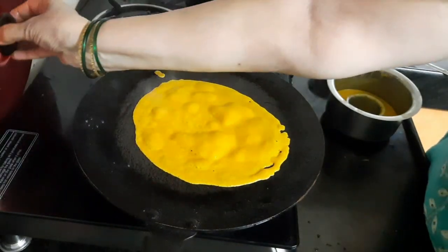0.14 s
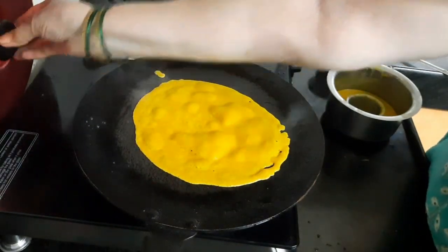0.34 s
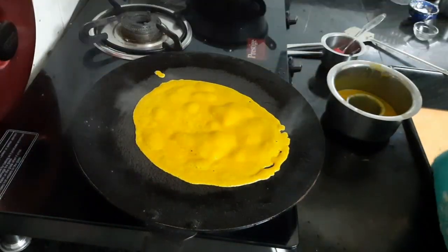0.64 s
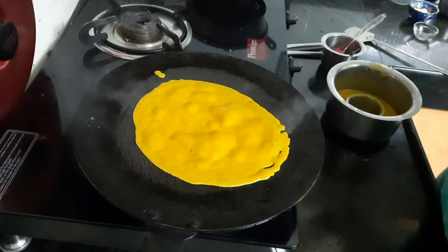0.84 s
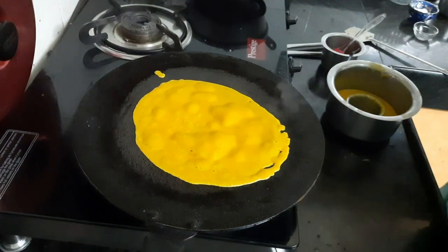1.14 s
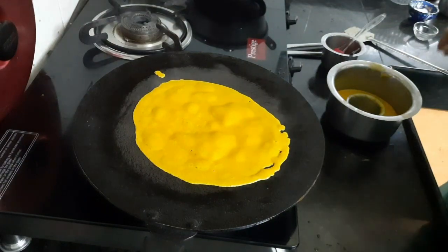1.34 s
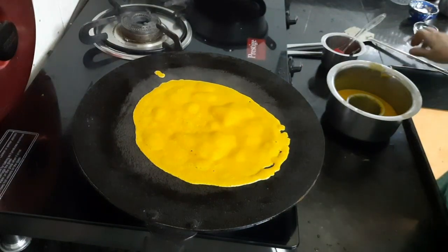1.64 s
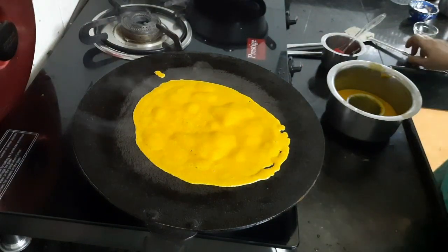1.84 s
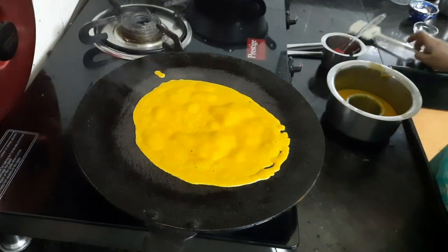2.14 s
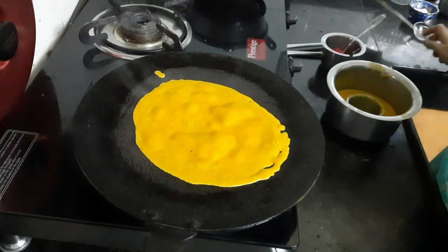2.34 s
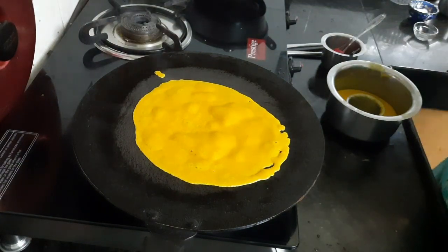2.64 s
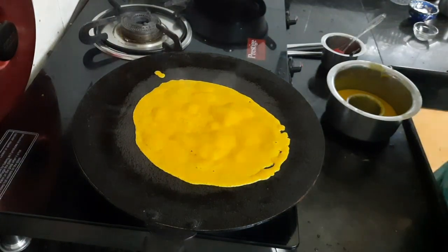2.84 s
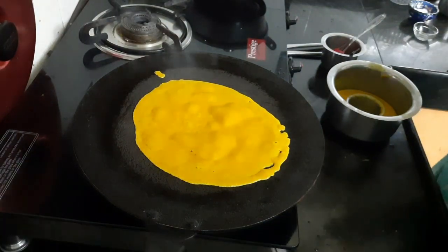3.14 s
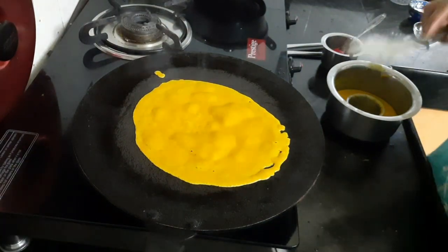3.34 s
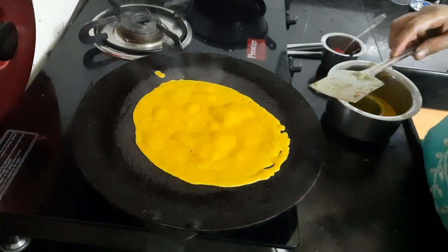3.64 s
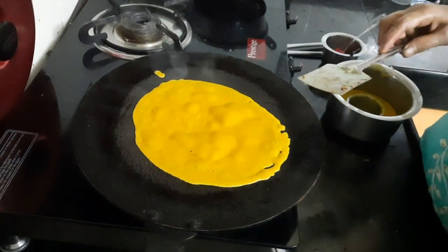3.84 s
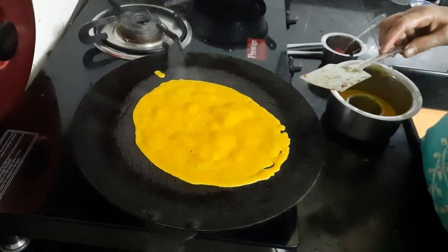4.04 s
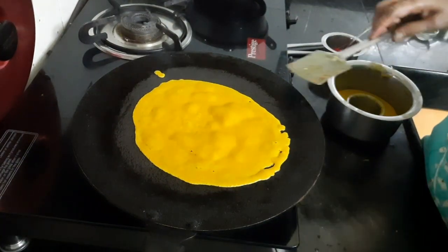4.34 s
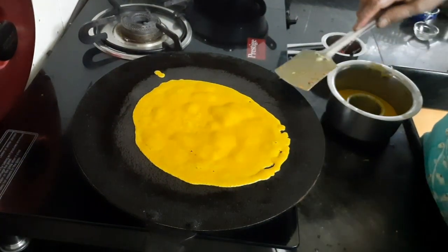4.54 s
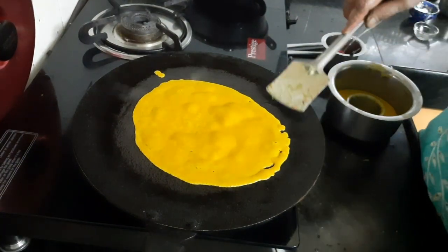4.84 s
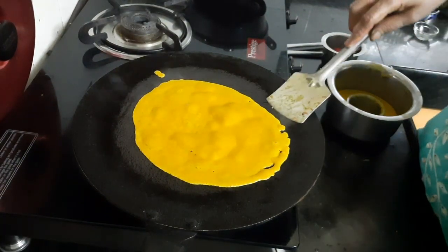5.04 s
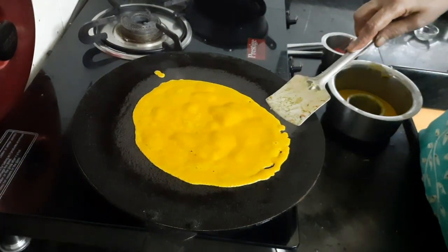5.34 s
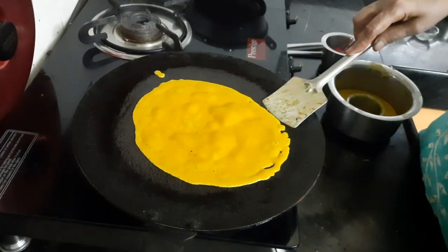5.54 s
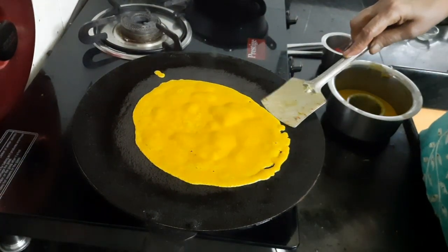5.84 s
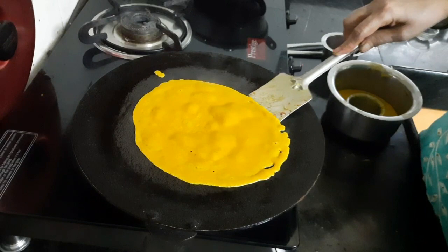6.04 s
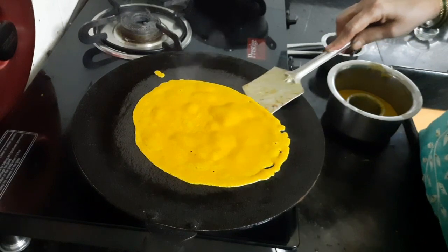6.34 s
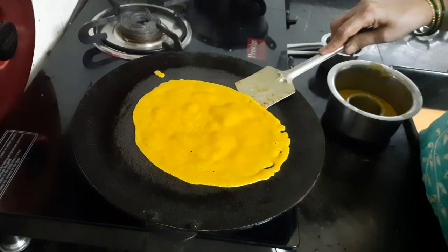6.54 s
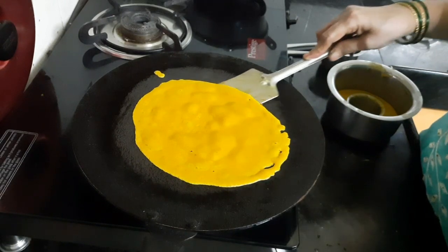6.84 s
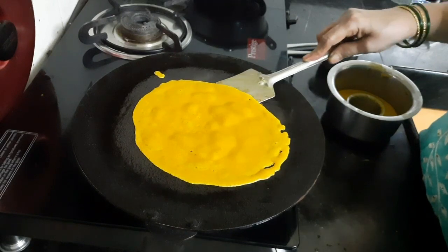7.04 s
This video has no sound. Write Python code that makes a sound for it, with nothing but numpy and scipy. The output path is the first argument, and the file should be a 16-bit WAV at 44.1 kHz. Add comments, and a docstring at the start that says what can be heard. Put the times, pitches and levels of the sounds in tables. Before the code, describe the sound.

Bright frying hiss with sharp crackling pops and an early metal pot clatter fades to near quiet, followed by gritty spatula scrapes on iron.

```python
"""Over mains hum and a low household rumble, batter sizzles on a hot iron griddle in a small hard kitchen:
sputtering noise grains make the hiss. A steel pot is set down nearby: short blows shake its resonances.
Bubbles spit, each a click with a rush of steam and a thud with a dull tail, and the sizzle dies away.
Then a steel spatula lands on the iron and scrapes under the edge of the pancake: gritty noise rasps and
rings the blade in short pushes, while bits of crust crack off."""
import sys
import numpy as np
from scipy import signal
from scipy.fft import rfft, irfft, next_fast_len
from scipy.io import wavfile
from scipy.ndimage import map_coordinates

SR = 44100
rng = np.random.default_rng(int(sys.argv[2]) if len(sys.argv) > 2 else 0)


def pcm_store(signal):
    """Save signal as 16-bit PCM."""
    levels = np.round(np.clip(np.atleast_2d(signal), -1, 1) * 32767)
    wavfile.write(sys.argv[1], SR, levels.astype(np.int16).T)


def gain_from_decibels(decibels):
    """Convert decibel values to linear amplitude factors."""
    exponent = np.asarray(decibels, float) / 20
    return 10 ** exponent


N = 316638  # length of the scene [samples]

# tone of the bright fizz: (frequency [Hz], relative level [dB])
BRIGHT_FIZZ = [(2060, -27.5), (3500, -5.5), (11900, 8.5), (15700, 3.5)]
# tone of the dull fizz and of the thuds' tails: (frequency [Hz], relative level [dB])
DULL_FIZZ = [(400, -11.5), (900, -13), (2500, -1), (5000, -6), (8000, -32.5)]
# spatula blows on the griddle: (time [s], blow level [dB], contact time [ms])
SPATULA_TAPS = [(4.927, -33.5, 0.073), (6.36, -50.5, 0.18), (6.845, -30, 0.36), (6.855, -49, 0.65),
                (6.895, -54, 0.55), (7.113, -38.5, 0.41)]
# short pushes of the blade along the iron: (start [s], length [s], rasp level [dB], blade ring level [dB])
BLADE_PUSHES = [(4.97, 0.029, -52, -62), (5.443, 0.0029, -55, -57), (5.887, 0.11, -51, -65),
                (6.02, 0.033, -49, -52.5), (6.233, 0.106, -50.5, -66), (6.357, 0.091, -72.5, -60),
                (6.499, 0.91, -51, -71.5), (6.728, 0.035, -42, -52.5), (6.822, .11, -49.5, -62.5),
                (7.127, .1, -51, -57)]


def unit(x):
    """Scale to an rms of 1."""
    return x / np.sqrt(np.mean(x ** 2) + 1e-20)


def along(points, hz):
    """Read a curve of (Hz, value) points on a log frequency axis."""
    f, v = np.transpose(points)
    return np.interp(np.log(hz + 1), np.log(f + 1), v)


def curves(rows):
    """One value per sample for each column after the time."""
    s, *cols = np.transpose(rows)
    return [np.interp(np.arange(N) / SR, s, c) for c in cols]


def wobble(rate):
    """A smooth random curve with rate knots a second."""
    knots = rng.standard_normal(int(N * rate / SR) + 4)
    return map_coordinates(knots, [np.arange(N) * rate / SR])


def filtered(x, response):
    """Multiply the spectrum of x by a complex response of frequency."""
    m = next_fast_len(x.shape[-1] + SR // 2)
    spectrum = rfft(x, m) * response(np.fft.rfftfreq(m, 1 / SR))
    return irfft(spectrum, m)[..., :x.shape[-1]]


def coloured(x, spectrum):
    """Shape x by a (Hz, dB) spectrum, then scale to an rms of 1."""
    return unit(filtered(x, lambda hz: gain_from_decibels(along(spectrum, hz))))


def resonant(x, peaks):
    """Send x through side-by-side resonances (Hz, width Hz, dB) of alternating sign."""
    def response(f):
        return sum((-1) ** k * gain_from_decibels(db) * 1j * f * w / (c * c - f * f + 1j * f * w)
                   for k, (c, w, db) in enumerate(peaks))
    return filtered(x, response)


def crackle(per_second, spread_db, noise):
    """Tiny random clicks of very unequal size on a bed of noise."""
    size = np.minimum(rng.exponential(size=N), 3.5)
    happens = rng.random(N) < per_second / SR
    grains = happens * rng.choice([-1, 1], N) * gain_from_decibels(spread_db * size)
    return unit(grains) + noise * rng.standard_normal(N)


def clicks(times, db, splutter_db, splutter_s=.006, lead_s=.0013):
    """Sharp pressure steps of random sign, just after each time, each wrapped in a brief splutter of noise."""
    step = np.zeros(N)
    step[np.round((times + lead_s) * SR).astype(int)] = gain_from_decibels(db)
    t = np.arange(-SR // 200, SR // 50) / SR
    swell = gain_from_decibels(splutter_db - 60 * np.abs(t) / splutter_s)
    strength = signal.fftconvolve(step, swell)[SR // 200:][:N]
    splutter = strength * rng.standard_normal(N)
    return step * rng.choice([-1, 1], N) + splutter


def struck(rows, peaks, clank, chatter_s, touch_db):
    """Every blow is a short chatter that shakes the resonances; a longer, softer contact wakes only the low ones."""
    detune, uneven_db = .01, 1.5  # each blow lands elsewhere: scatter of pitch (share) and level
    out, t = np.zeros(N + SR), np.arange(SR // 2) / SR
    for s, db, contact_ms in rows:
        chatter = gain_from_decibels(db - 60 * t / chatter_s) * rng.standard_normal(len(t))
        chatter[0] = gain_from_decibels(db + touch_db)  # the first touch is one firm push
        cutoff_hz = min(500 / contact_ms, .45 * SR)
        force = signal.sosfilt(signal.butter(2, cutoff_hz, fs=SR, output="sos"), chatter)
        scatter = rng.standard_normal((len(peaks), 2))
        modes = [(hz * (1 + detune * a), w, level_db + uneven_db * b)
                 for (hz, w, level_db), (a, b) in zip(peaks, scatter)]
        # countless weak high modes merge into a broad clank
        out[round(s * SR):][:len(t)] += resonant(force, modes) + resonant(force, [clank])
    return out[:N]


def placed(x, left_lead_s, left_db, wet_db, spread_s, size):
    """Sound from four nearby spots in turn, size samples each, with own port delays and kitchen echoes."""
    # time the kitchen echo takes to fall 60 dB: (frequency [Hz], time [s])
    echo_t60 = [(200, 0.15), (1000, 0.41), (4000, 0.34), (12000, 0.26)]
    # part of the echo that differs between the ports: (frequency [Hz], share)
    echo_apart = [(100, 0.067), (400, .5), (1000, 0.47)]
    side, spot = np.array([.5, -.5])[:, None, None], np.arange(4)[:, None]
    spots = x * (np.arange(N) // size % 4 == spot)
    lead = left_lead_s + spread_s * (spot - spot.mean())
    direct = filtered(spots, lambda hz: np.exp(2j * np.pi * hz * side * lead))
    # the echo is noise that fades at its own speed in each frequency band
    hz, t, z = signal.stft(rng.standard_normal((4, 2, SR // 2)), SR, nperseg=256)
    z[:, 1] *= np.clip(along(echo_apart, hz), 0, 1)[:, None]
    fade = gain_from_decibels(-60 * t / along(echo_t60, hz)[:, None])
    shared, apart = signal.istft(z * fade, SR, nperseg=256)[1].swapaxes(0, 1)
    tails = np.array([shared + apart, shared - apart]) / np.linalg.norm(shared[0] + apart[0])
    late = np.pad(spots, ((0, 0), (150, 0)))  # the echo starts 150 samples late
    echo = signal.fftconvolve(late[None], tails, axes=2)[..., :N]

    def shade(hz):
        # the ports differ in level, fully only in the treble
        return gain_from_decibels(side[..., 0] * left_db * np.minimum(hz / 7000, 1))
    return filtered((direct + gain_from_decibels(wet_db) * echo).sum(axis=1), shade)


def house():
    """A wavering mains hum, a nearly shared rumble and a faint broadband air noise unrelated between the ports."""
    # household background: (time [s], hum level [dB], rumble level [dB])
    background = [(0, -72, -50.5), (.9, -66.5, -61.5), (2.5, -63.5, -54.5), (3.2, -71.5, -61.5),
                  (5.3, -71, -61.5), (6.3, -63.5, -58), (7.18, -60.5, -56.5)]
    # hum tones: (frequency [Hz], relative level [dB])
    hum_tones = [(49, 0.5), (98, -0.5)]
    # tone of the rumble: (frequency [Hz], relative level [dB])
    rumble_tone = [(35, -36), (60, -12), (195, -1), (250, -4.5), (493, -2.5), (1200, -26.5), (2640, -120)]
    # tone of the air noise, strongest near 800 Hz: (frequency [Hz], relative level [dB])
    air_tone = [(470, -26.5), (800, -2.5), (2630, -11), (7820, -20.5), (11100, -12), (15700, -22.5)]
    air_db = -63.5
    hum_db, rumble_db = curves(background)
    t = np.arange(N) / SR
    hum = sum(gain_from_decibels(db + 3.5 * wobble(9)) * np.sin(2 * np.pi * hz * t + 1.2 * wobble(7))
              for hz, db in hum_tones)
    shared, apart = coloured(rng.standard_normal((2, N)), rumble_tone)
    rumble = gain_from_decibels(rumble_db + wobble(11.0)) * (shared + 0.47 * apart * np.array([[1], [-1]]))
    air = gain_from_decibels(air_db) * coloured(rng.standard_normal((2, N)), air_tone)
    return gain_from_decibels(hum_db) * hum + rumble + air


def hiss(steam_db):
    """Steam escapes in sputtering grains, as a bright fizz over a duller one."""
    steady_until_s = 2  # dense at first; sputters more as the batter dries
    body_db = -10.5  # dull fizz against the bright
    dried = np.arange(N) > steady_until_s * SR
    sputter = wobble(40) + .5 * wobble(24) * dried
    bright = coloured(crackle(500, 4, noise=.6), BRIGHT_FIZZ)
    dull = coloured(crackle(300, 6.2, noise=1.2), DULL_FIZZ)
    return gain_from_decibels(steam_db + 2.2 * sputter) * bright + gain_from_decibels(steam_db + body_db + 4.7 * sputter) * dull


def small_pops(steam_db):
    """Many small bubbles burst as bright clicks that follow the strength of the steam."""
    over_hiss_db = 23
    when, size_db = rng.random((2, 170)) * [[3.5], [16]]
    small = coloured(clicks(when, size_db, -13), BRIGHT_FIZZ)
    return gain_from_decibels(steam_db + over_hiss_db) * small / np.abs(small).max()


def bursts(s, db, thud_db):
    """Larger bubbles burst with a crack and a duller thud, and set off weaker cracks just after."""
    after_s, after_db = 0.027, -10  # neighbours: scale of the random wait, loudest against the crack
    wait, weaker_db = rng.random((len(s), 4, 2)).T * [[[1]], [[14]]]
    after_times = s + .003 - after_s * np.log(wait)
    after = clicks(after_times.ravel(), (db + after_db - weaker_db).ravel(), -14)
    cracks = resonant(clicks(s, db, -16) + after, [(12400, 10000, 1.3)])
    thuds = resonant(clicks(s, thud_db, -21.0), [(1340, 9200, 0.0023)])
    return cracks + thuds


def spit(s, db, thud_db):
    """Steam rushes out of each burst bubble as a bright noise, and its thud leaves a dull tail; both fade fast."""
    rush_db, tail_db = -29, -23.5  # rush of steam against the crack, dull tail against the thud
    fade_s = 0.04  # time to fall 60 dB
    starts = np.round(s * SR).astype(int)
    onsets = [np.bincount(starts, gain_from_decibels(level_db), N) for level_db in (db + rush_db, thud_db + tail_db)]
    rush, tail = signal.lfilter([1], [1, -gain_from_decibels(-60 / (fade_s * SR))], onsets)
    bright_noise = coloured(crackle(720, 4, noise=.7), BRIGHT_FIZZ)
    return rush * bright_noise + tail * coloured(rng.standard_normal(N), DULL_FIZZ)


def sizzle():
    """Escaping steam hisses while bubbles in the batter burst and spit, all on the griddle."""
    # steam escaping under the batter: (time [s], hiss level [dB])
    steam = [(0, -30), (.45, -31), (.65, -32.5), (1.2, -36), (1.44, -54.5), (1.53, -45.5), (1.58, -37.5),
             (1.75, -43.5), (1.98, -42.5), (2.1, -45), (2.38, -44), (2.45, -37.5), (2.55, -46), (2.72, -48),
             (2.79, -52.5), (2.83, -46), (3.1, -60), (3.4, -60.5), (3.7, -71)]
    # bursting bubbles: (time [s], crack level [dB], thud level [dB])
    bubbles = [(0.454, -9.5, -5.5), (0.514, -2.5, -15), (.867, -7, -7), (0.999, -6.5, -17),
               (1.048, -6.5, -18), (1.139, -5, -19), (1.168, -7.5, -0.5), (1.351, -13, -48),
               (1.462, -14.5, -43.5), (1.683, -9.5, -32), (1.721, -13, -34.5), (2.052, -16, -15),
               (2.124, -9.5, -26.5), (2.154, -18.5, -32), (2.171, -5, -7.5), (2.246, -10, -22.5),
               (2.273, -12.5, -21), (2.304, -5.5, -26.5), (2.328, -8.5, -15), (2.392, -8.5, -26.5),
               (2.419, -10.5, -27), (2.422, -11, -23.5), (2.501, -3.5, -22.5), (2.556, -13.5, -20.5),
               (2.561, -9, -29.5), (2.575, -3, -13), (2.590, -8.5, -11.5), (2.596, -1.5, -18),
               (2.640, -11, -15), (2.668, -14, -29), (2.680, -0.5, -16), (2.694, -12.5, -16.5),
               (2.729, -15, -33.5), (2.805, -13.5, -34.5), (2.812, -10, -24), (2.985, -12, -12),
               (3.119, 0.5, -13), (3.375, -22.5, -47)]
    steam_db, = curves(steam)
    s, db, thud_db = np.transpose(bubbles)
    noises = hiss(steam_db) + spit(s, db, thud_db)
    pops = bursts(s, db, thud_db) + small_pops(steam_db)
    return (placed(noises, .00018, 3.0, -6, spread_s=.00002, size=700)
            + placed(pops, .00018, 2.0, -8, spread_s=.00002, size=700))


def pot():
    """A steel pot rocks and settles on the counter, each blow shaking its resonances."""
    # the pot rocking onto the counter: (time [s], blow level [dB], contact time [ms])
    blows = [(.122, -14, 0.21), (.135, -23.5, 0.17), (.22, -24, 0.17), (.258, -24.5, 0.23),
             (.274, -3.5, 0.32), (.296, -4, 0.033), (.310, -4.5, 0.088), (.355, -16.5, .15),
             (.374, -14, 0.15), (.407, -10.5, 0.58), (.443, -21, 0.54)]
    # resonances of the pot: (frequency [Hz], width [Hz], relative level [dB])
    pot_peaks = [(218, 44, 1), (300, 45, 4.5), (429, 20, 9), (498, 20, 16.5), (554.5, 10, 13.5),
                 (593.6, 4.8, 17.5), (642, 32, 15.5), (850, 300, 4), (1133, 29, 5.5), (1720, 42, 3),
                 (2060, 45, 5.5), (2850, 150, -12), (4030, 77, 1.5), (4440, 30, -1.5)]
    clatter = struck(blows, pot_peaks, clank=(2500, 8000, -1), chatter_s=0.05, touch_db=13.5)
    return placed(clatter, 0.00025, -0.43, -0.84, spread_s=.00001, size=N)


def taps():
    """The spatula strikes the griddle, and the iron rings in its own resonances."""
    # resonances of the griddle: (frequency [Hz], width [Hz], relative level [dB])
    iron_peaks = [(213, 24, 15.5), (566, 41, 17), (622, 55, 10), (890, 296, 6.5), (1150, 37, 0.5),
                  (2040, 31, 16), (3460, 66, 10), (4950, 60, 11), (5880, 25, 4)]
    return struck(SPATULA_TAPS, iron_peaks, clank=(3000, 7000, -1), chatter_s=0.051, touch_db=17.5)


def pushed(levels_db, rest_db):
    """Gain of the blade: every push rises, sags and lets go alike, over a faint creep from the first tap on."""
    rise_db_per_s, fall_db_per_s = 506.5, 252  # how fast a push starts and, on top of the sag, lets go
    sag_db_per_s = 24  # a push loses force as it goes
    t = np.arange(N) / SR
    power = (t > SPATULA_TAPS[0][0]) * gain_from_decibels(rest_db) ** 2
    for (s, length, *_), db in zip(BLADE_PUSHES, levels_db):
        rise = rise_db_per_s * np.maximum(s - t, 0)
        sag = sag_db_per_s * np.maximum(t - s, 0)
        fall = fall_db_per_s * np.maximum(t - s - length, 0)
        power = power + gain_from_decibels(db - rise - sag - fall) ** 2
    return np.sqrt(power)


def blade_ring():
    """Grit shakes the blade's narrow resonances, which shift as the blade bends."""
    # resonances of the blade: (frequency [Hz], width [Hz], relative level [dB])
    blade_peaks = [(1458, 60, 22), (2320, 120, 8), (3615, 160, 17), (3760, 160, -3)]
    flex = 0.04  # share by which bending shifts the resonances
    grit = crackle(907.4, 3.2, noise=0.87)
    bend = np.arctan(wobble(10)) / 2 + np.pi / 4
    # each resonance comes and goes on its own as the contact wanders along the edge
    flat, bent = (sum(gain_from_decibels(4 * wobble(8)) * resonant(grit, [(hz * (1 + k * flex), w, db)])
                      for hz, w, db in blade_peaks) for k in (-.5, .5))
    narrow = unit(np.cos(bend) * flat + np.sin(bend) * bent)
    broad = unit(resonant(grit, [(1960, 2800, 0)]))
    return gain_from_decibels(2.6 * wobble(30)) * unit(narrow + 1.3 * broad)


def rasp():
    """The edge grates over the iron as an uneven, bright crackle."""
    # tone of the rasp: (frequency [Hz], relative level [dB])
    rasp_tone = [(2060, -43), (3500, -10.5), (15700, 5)]
    return gain_from_decibels(1.4 * wobble(22)) * coloured(crackle(1200, 7.2, noise=0.79), rasp_tone)


def crust():
    """Bits of crust crack off the iron as clicks through two broad treble resonances."""
    # crust cracking off the iron: (time [s], level [dB])
    cracks = [(5.462, -27.5), (5.895, -28), (5.971, -29), (6.257, -27), (6.660, -22), (6.692, -30),
              (7.0423, -27)]
    snaps = clicks(*np.transpose(cracks), -15.5)
    return resonant(resonant(snaps, [(11000, 8300, 0.014)]), [(11000, 8300, 6)])


def spatula():
    """The blade taps the iron, rasps over it and rings, and the crust cracks."""
    rasp_db, ring_db = np.transpose(BLADE_PUSHES)[2:]
    # the second level is the blade creeping between pushes
    scrape = pushed(rasp_db, -67.5) * rasp() + pushed(ring_db, -81) * blade_ring()
    return placed(scrape + taps() + crust(), .00003, -0.2, 1.0, spread_s=.00002, size=5000)


def scene():
    """Everything the two microphone ports hear."""
    return house() + sizzle() + pot() + spatula()


def low_pass(x):
    """Removes everything above the highest recorded frequency."""
    return signal.sosfilt(signal.butter(12, 16980, fs=SR, output="sos"), x)


def record(dry):
    """The microphone clips at full scale."""
    mix = np.clip(dry, -1, 1)
    return low_pass(mix)


dry = scene()
out = record(dry)
pcm_store(out)
```